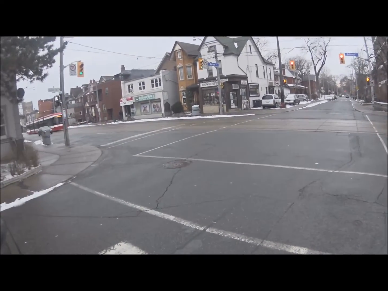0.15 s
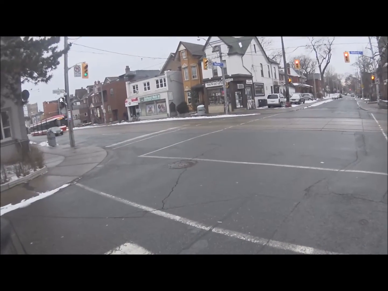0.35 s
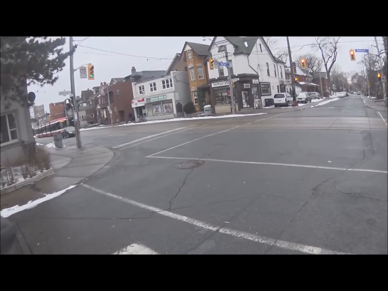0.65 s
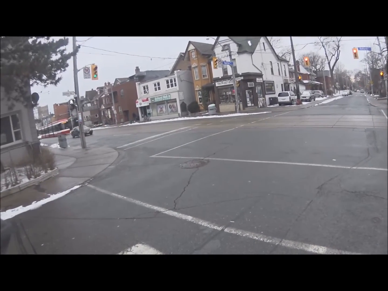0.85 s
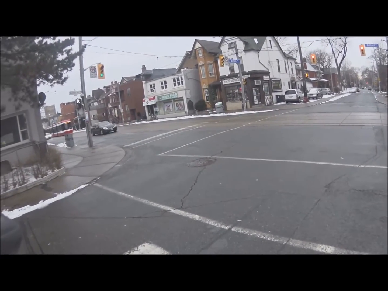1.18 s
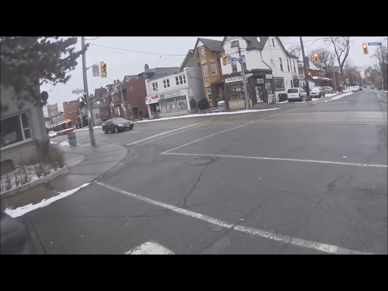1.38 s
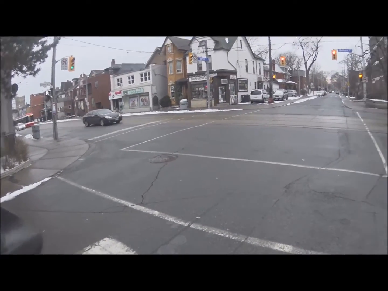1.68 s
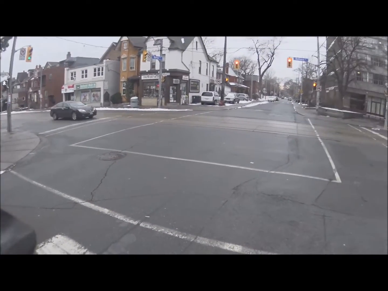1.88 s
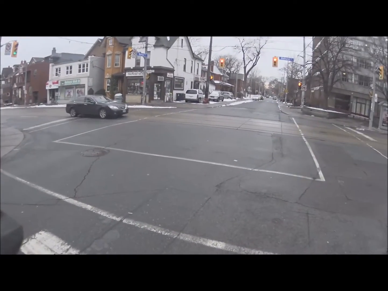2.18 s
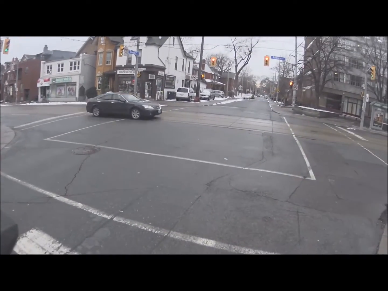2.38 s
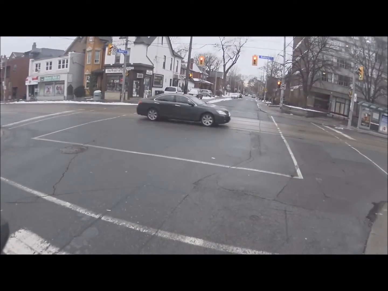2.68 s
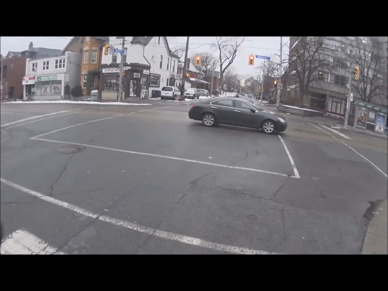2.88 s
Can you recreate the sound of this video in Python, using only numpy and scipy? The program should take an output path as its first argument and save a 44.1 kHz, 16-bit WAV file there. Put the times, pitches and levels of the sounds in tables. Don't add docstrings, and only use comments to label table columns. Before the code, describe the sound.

Cars approach over a damp street crossing, tyre roar and wet hiss building to the end. Distant traffic roars steadily, wind thuds on the boxy, plastic-housed camera microphone, and grit snaps around two seconds.

```python
import sys
import numpy as np
from scipy import signal
from scipy.fft import rfft, irfft, next_fast_len
from scipy.io import wavfile
from scipy.ndimage import uniform_filter1d

SR = 44100
rng = np.random.default_rng(int(sys.argv[2]) if len(sys.argv) > 2 else 0)


def nominal_scale(level):
    x = np.asarray(level, float) / 20
    return 10 ** x


def to_wav(s):
    ch = np.atleast_2d(s).T
    pcm = np.round(np.clip(ch, -1, 1) * 32767)
    wavfile.write(sys.argv[1], SR, pcm.astype(np.int16))


N = 134064
SIZE = next_fast_len(N)
HZ = np.maximum(np.arange(SIZE // 2 + 1) * SR / SIZE, 1)
T = np.arange(N) / SR


def level(x, db):
    return x * nominal_scale(db) / np.sqrt(np.mean(x ** 2))


def along(table, axis=1):
    table = np.array(table, float)
    return np.interp(np.log(HZ), np.log(table[:, 0]), table[:, axis])


def bells(table):
    response = 1
    for hz, width, db in table:
        detune = 1j * (HZ / hz - hz / HZ) * hz / width
        response = response * (nominal_scale(db / 2) + detune) / (nominal_scale(-db / 2) + detune)
    return response


def walk(rate_hz):
    hold = int(SR / rate_hz)
    steps = np.repeat(rng.standard_normal(N // hold + 1), hold)
    return 1.3 * uniform_filter1d(uniform_filter1d(steps, hold), hold)[:N]


def noise():
    return rng.standard_normal((2, N))


def field(source, colour, swell_db, flicker_db):
    spectrum = rfft(source, SIZE) * nominal_scale(along(colour))
    out, swell = 0, walk(1.27)
    for half_octave in range(9, 29):
        band = np.clip(1 - abs(2 * np.log2(HZ) - half_octave), 0, 1)
        swell = .8 * swell + .6 * walk(3)
        gain = nominal_scale(swell_db * swell + flicker_db * walk(14))
        out = out + irfft(spectrum * band, SIZE)[:, :N] * gain
    return level(out, 0)


# frequency in Hz, level in dB per Hz.
TOWN_COLOUR = [(20, -4), (40, -6.5), (100, -4), (200, -0.5), (850, -3), (2500, -4.5), (5500, -13.5),
               (8500, -29.5)]


def town():
    return nominal_scale(-37) * field(noise(), TOWN_COLOUR, .5, 1.2)


# start in seconds, end in seconds, pitch in Hz, level in dB.
FAR_ENGINE = [
    (0.375, .52, 82, -49),
    (.68, 0.875, 80, -48.5),
]


def far_engine():
    out = 0
    for start, end, hz, db in FAR_ENGINE:
        swell = np.sin(np.pi * np.clip((T - start) / (end - start), 0, 1))
        out = out + nominal_scale(db) * swell * np.sin(2 * np.pi * hz * T)
    return out


# frequency in Hz, level in dB per Hz.
WIND_COLOUR = [(15, 11), (40, -3), (60, -9), (120, -25), (400, -42)]
# peak time in seconds, length in seconds, rise in dB.
GUSTS = [
    (.15, 0.22, 12),
    (.75, 0.18, 11),
    (1.254, 0.051, 16),
    (1.7, 0.14, 16),
    (2.05, 0.23, 11),
]


def wind():
    gust_db = sum(db * np.exp(-((T - s) / length) ** 2) for s, length, db in GUSTS)
    flutter_db = 3 * walk(12.2)
    return nominal_scale(-61.5 + gust_db + flutter_db) * field(noise(), WIND_COLOUR, .5, 1.3)


# time in seconds, crossing car in dB, close passing car in dB.
CAR_NEARNESS = [(0, -8.5, -12), (.35, -8, -22), (.7, -7.5, -9.5), (.8, -6.5, -13), (1.1, -4.5, -22),
                (1.4, -2.5, -10), (1.7, -4, -3.5), (1.95, -3, -5.5), (2.2, -2, -2.5), (2.55, -1, -1.5),
                (2.75, -2, 0.04), (3.04, -1, 1)]


def nearness():
    near = np.array(CAR_NEARNESS, float)
    return [uniform_filter1d(np.interp(T, near[:, 0], near[:, car]), SR // 20) for car in (1, 2)]


# frequency in Hz, level in dB per Hz.
BODY_COLOUR = [(60, -3.5), (120, -9), (210, 1), (450, 3.5), (900, -16.5), (2700, -3), (4400, -6.5),
               (7000, -58)]


def body(near_db):
    return nominal_scale(-36 + near_db) * field(noise(), BODY_COLOUR, .5, .8)


# pitch in Hz, width in Hz, level in dB.
ENGINE_DRONES = [(222, 14, 0), (280, 20, -4), (425, 30, -2)]


def engine(near_db):
    level_db, slope, rough_db = -44.5, 0.5, 3
    peaks = sum(nominal_scale(db) / (1 + (2 * (HZ - hz) / width) ** 2) for hz, width, db in ENGINE_DRONES)
    drone = irfft(rfft(noise(), SIZE) * peaks, SIZE)[:, :N]
    drone = drone * nominal_scale(rough_db * walk(4.3))
    return level(drone, level_db) * nominal_scale(slope * near_db)


# time in seconds, peak level in dB, centre in Hz, decay in milliseconds.
GRIT_TICKS = [
    (.645, -43, 7500, 5),
    (.646, -46, 9800, 5),
    (.656, -44, 8500, 9),
    (1.921, -45, 8500, 3),
    (2.058, -19, 5900, 1),
    (2.058, -24, 2650, 1.2),
    (2.110, -26, 2800, 1.2),
    (2.193, -22, 2700, 1.2),
    (2.850, -29, 5800, 2.5),
]


def grit():
    out, age = np.zeros(N), np.arange(2000) / SR
    for s, db, hz, decay_ms in GRIT_TICKS:
        burst = rng.standard_normal(len(age)) * np.exp(-age * 1000 / decay_ms)
        burst[0] += 6
        b, a = signal.iirpeak(hz, 4.5, fs=SR)
        tick = signal.lfilter(b, a, signal.lfilter(b, a, burst))
        out[int(s * SR):][:len(age)] += nominal_scale(db) * tick / abs(tick).max()
    return out


# frequency in Hz, level in dB per Hz.
SPRAY_COLOUR = [(1500, -60), (3000, 0), (4500, 0.5), (6500, 2.5), (8000, -6), (11000, -15.5)]


def spray(near_db):
    level_db, slope = -34.5, 1.78
    drops_per_s, scatter_db, drop_share = 3500, 2.5, 0.31
    hit = rng.random((2, N)) < drops_per_s / SR
    size = nominal_scale(scatter_db * rng.exponential(size=(1, N)))
    drops = hit * np.sign(noise()) * size
    water = drop_share * level(drops, 0) + (1 - drop_share) * noise()
    return nominal_scale(level_db + slope * near_db) * field(water, SPRAY_COLOUR, .4, .8)


# frequency in Hz, level in dB per Hz.
TYRE_COLOUR = [(80, -50), (200, -5.5), (450, -1.5), (750, 2.5), (1200, 3.5), (3000, -1.5), (6000, -11),
               (10000, -31.5)]


def tyres(near_db):
    level_db, slope = -28, 1.33
    return nominal_scale(level_db + slope * near_db) * field(noise(), TYRE_COLOUR, .6, 1.8)


def scene():
    crossing, passing = nearness()
    cars = body(passing) + engine(passing) + grit() + spray(passing) + tyres(crossing)
    front, around = town() + far_engine() + wind() + cars
    return np.array([front + around, front - around])


# frequency in Hz, level in dB, lag in radians, likeness from 0 to 1.
PORT_DIFFERENCE = [(25, -.8, .1, .985), (150, -4, .72, .91), (800, -4.2, .75, .9), (1450, -1.8, .5, .995),
                   (3000, 3.5, .2, .82), (5000, 3, .3, .9), (8000, 2.2, .4, .55), (10800, .2, .1, .9)]
# centre in Hz, width in Hz, likeness lost from 0 to 1, added lag in radians.
PORT_LEAKS = [(920, 90, .3, 1.0), (1970, 80, .5, 0), (2480, 150, .1, -.7), (2620, 170, .9, 0),
              (10000, 350, .85, 0)]
# centre in Hz, width in Hz, gain in dB.
LEFT_RINGS = [(1030, 180, 5), (1850, 120, 2), (1960, 130, -7), (2150, 260, -5), (2612, 220, 10)]


def left_port(front, around):
    like, lag = along(PORT_DIFFERENCE, axis=3), along(PORT_DIFFERENCE, axis=2)
    for hz, width, lost, late in PORT_LEAKS:
        like = like * (1 - lost / (1 + (2 * (HZ - hz) / width) ** 2))
        lag = lag + late / (1 + ((HZ - hz) / width) ** 2)
    heard = like * front + np.sqrt(1 - like ** 2) * around
    return heard * bells(LEFT_RINGS) * nominal_scale(along(PORT_DIFFERENCE)) * np.exp(-1j * lag)


# centre in Hz, width in Hz, gain in dB.
HOUSING_RINGS = [(436, 140, 0), (594, 70, -3.5), (1467, 613, 17), (1822, 260, 2.5), (2120, 100, -4),
                 (2326, 276, 5.5), (4460, 730, 4.5), (5750, 1050, 4), (9900, 270, -2.5), (10070, 310, 6)]


def housing(ports):
    return irfft(ports * bells(HOUSING_RINGS), SIZE)[:, :N]


def low_pass(x):
    return signal.sosfilt(signal.butter(12, 11040, fs=SR, output="sos"), x)


def record(dry):
    front = rfft((dry[0] + dry[1]) / 2, SIZE)
    around = rfft((dry[0] - dry[1]) / 2, SIZE)
    mix = housing(np.array([left_port(front, around), front]))
    return low_pass(mix)


dry = scene()
out = record(dry)
to_wav(out)
```